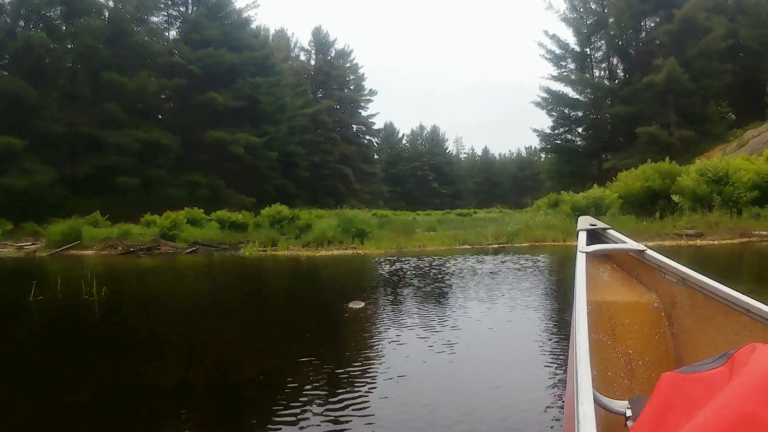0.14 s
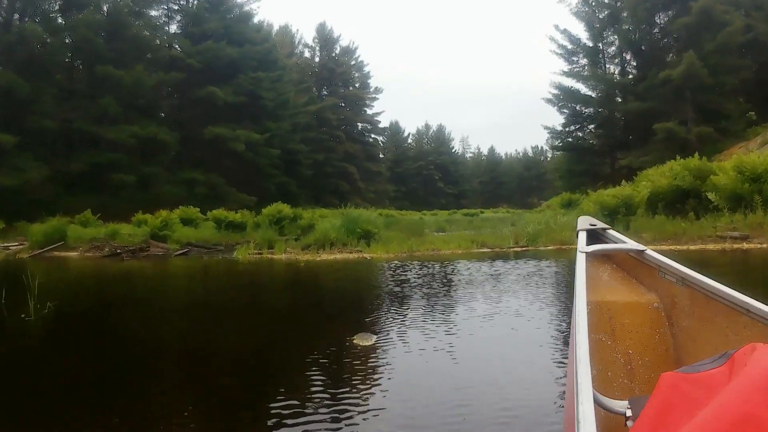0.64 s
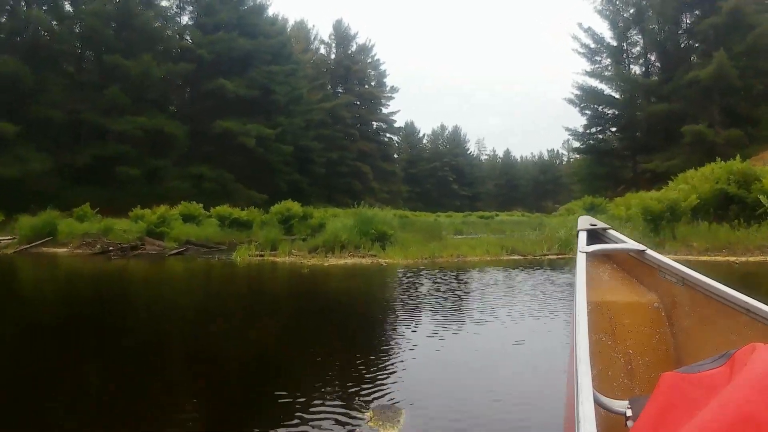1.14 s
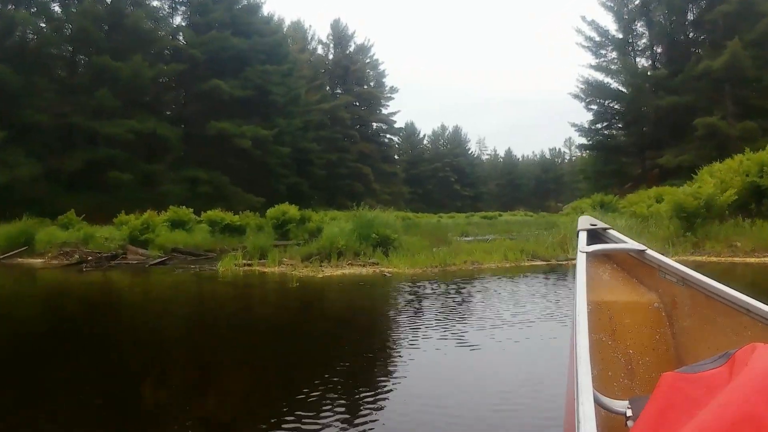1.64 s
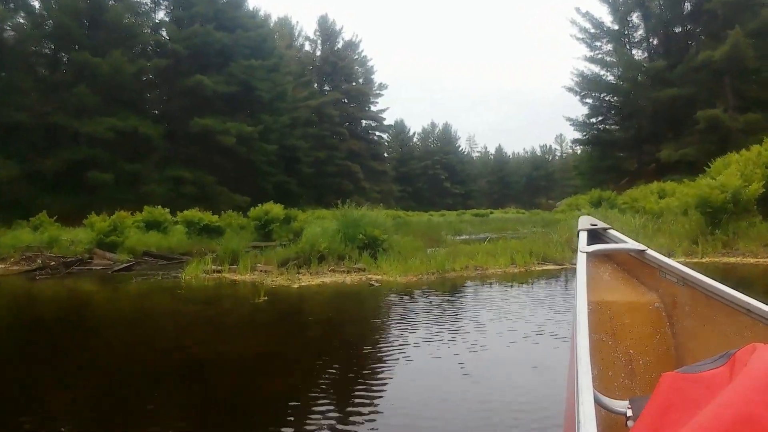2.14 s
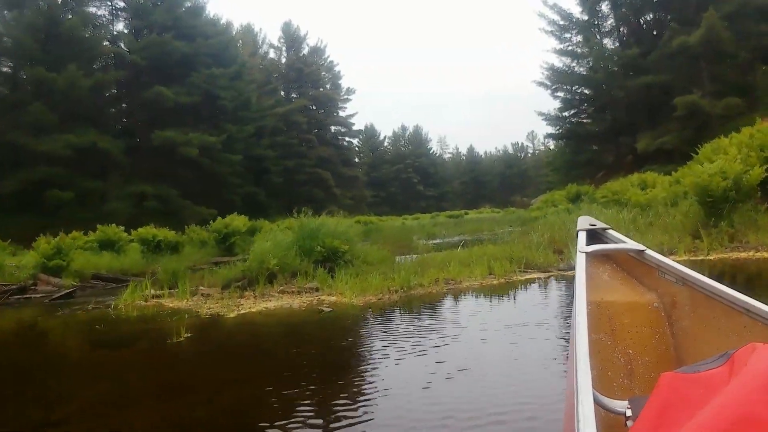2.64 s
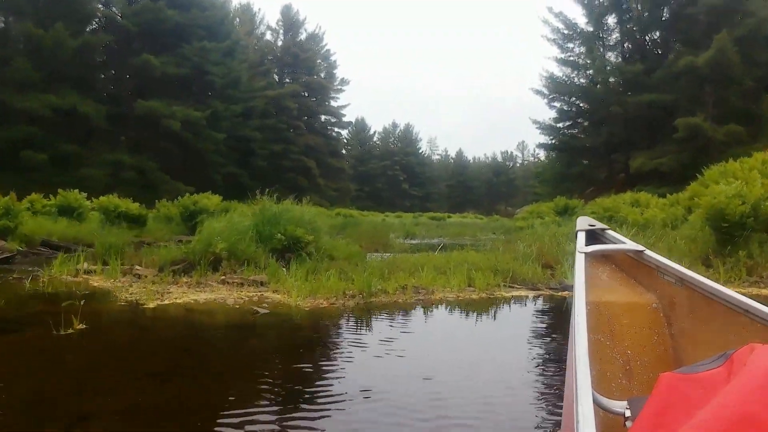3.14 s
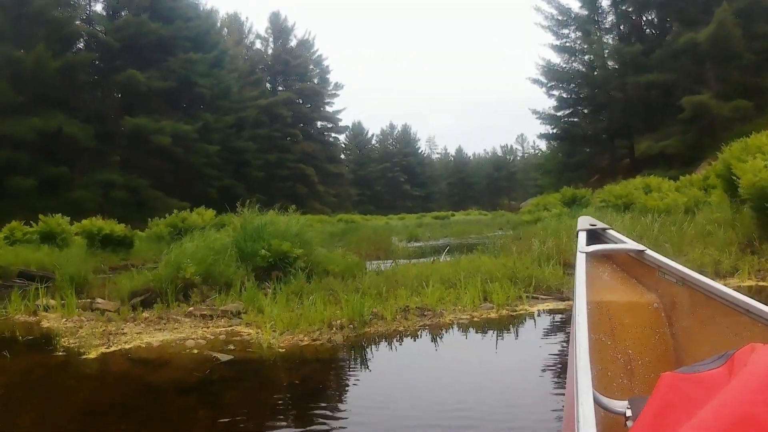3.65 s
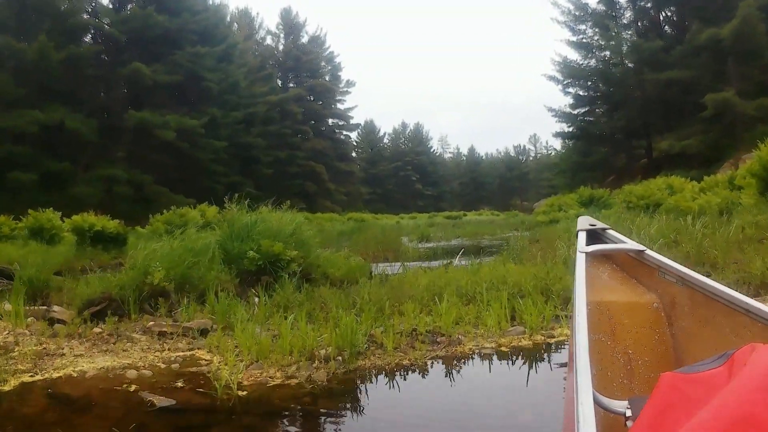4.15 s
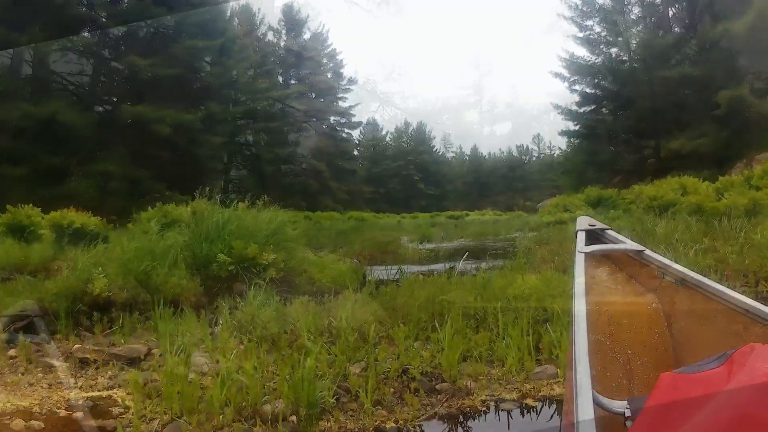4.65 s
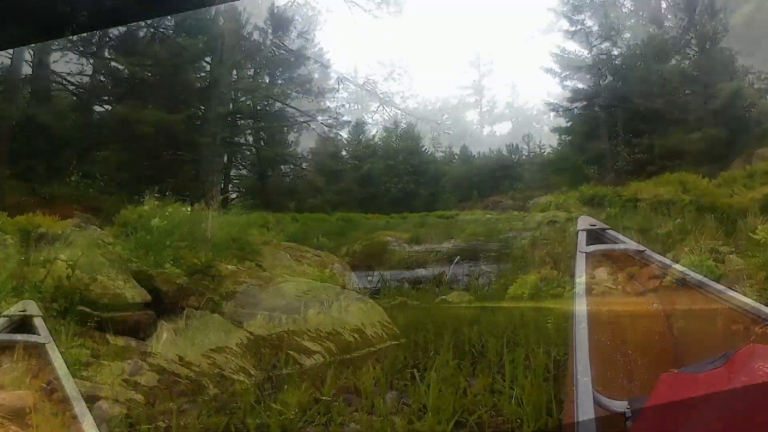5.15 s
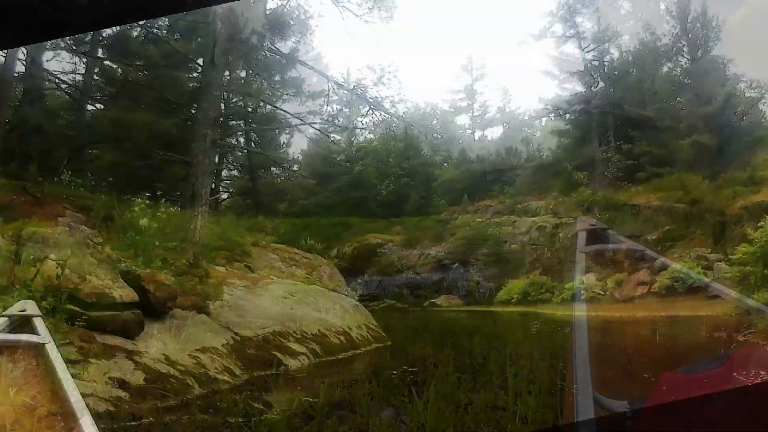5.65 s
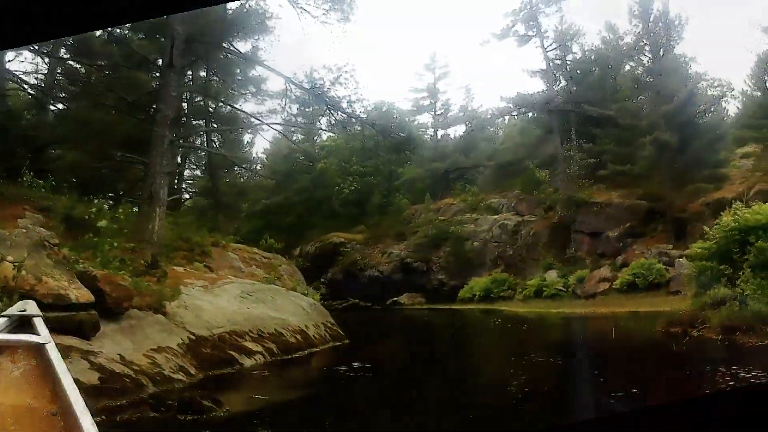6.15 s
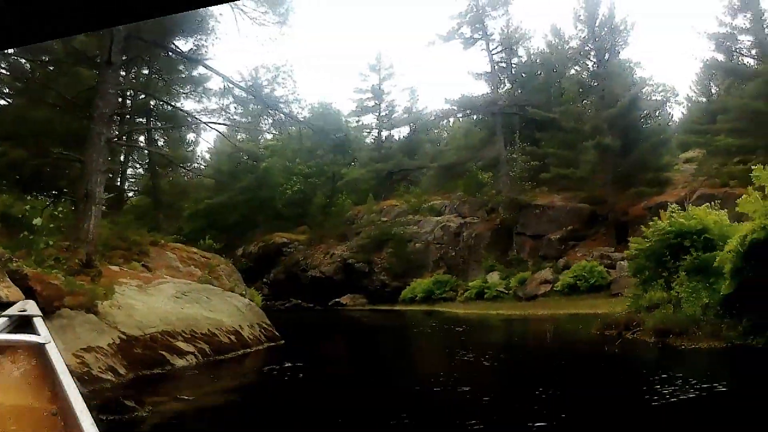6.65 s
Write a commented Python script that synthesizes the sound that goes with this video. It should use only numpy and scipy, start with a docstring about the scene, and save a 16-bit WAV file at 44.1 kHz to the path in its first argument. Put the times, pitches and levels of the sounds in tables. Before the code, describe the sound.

The setting is a quiet marsh channel, heard close from a small microphone on a canoe, over barely audible hiss and a faint wavering low hum. It opens with soft low thumps on the microphone, then tiny drips and light taps, with a faint breathy rubbing squeak near 1.1 and 1.55 s. At about 2.0 s a strong hollow knock and bubbly plop strikes, followed by short watery swishes at 2.1 and 2.4 s. More knocks and splashes come at 2.85, 3.1-3.2 and 3.6 s, the last a bright, crisp splash. From 3.7 to 5.0 s it is nearly still, with small slaps, bumps and a faint squeak. At 5.05-5.35 s a sharp splash and abrupt swish ring out, with one thin high bird chirp around 5.3 s. Low thumps follow near 5.55 s, then churning, gurgling, fizzing water swells around 6.1-6.35 s and dies away by 6.8 s.

```python
"""A quiet marsh channel, heard at one small microphone on board a gliding canoe.
The paddle swishes, splashes and knocks: struck hull modes ring under bright noise spray,
and torn water is a sum of gliding bubble tones, resonant noise and fizz.
Low noise and single pulses thump the microphone, narrow noise squeaks, and a small bird chirps once
as a gliding tone with its octave, over faint filtered hiss and a wavering harmonic hum."""
import sys
import numpy as np
from scipy import signal
from scipy.fft import rfft, irfft, next_fast_len
from scipy.io import wavfile
from scipy.ndimage import uniform_filter1d

SR = 44100
rng = np.random.default_rng(int(sys.argv[2]) if len(sys.argv) > 2 else 0)


def voltage_ratio(decibels):
    """Convert decibels (scalar or array-like) to amplitude ratios, 20 dB per decade."""
    exponent = np.asarray(decibels, float) / 20
    return 10 ** exponent


def log_audio(samples):
    """Write samples as a 16-bit WAV file to the path given in sys.argv[1]."""
    # one column per channel
    frames = np.atleast_2d(samples).T
    # limit to full scale, then quantise
    limited = np.clip(frames, -1, 1)
    pcm = np.round(limited * 32767).astype(np.int16)
    wavfile.write(sys.argv[1], SR, pcm)


N = 298557


def evened(x):
    """Normalisation: scales a signal to an rms of 1."""
    return x / np.sqrt(np.mean(x ** 2) + 1e-20)


def add(mix, s, sound):
    """Superposition: sums a sound into the mix from s seconds on."""
    part = mix[max(round(s * SR), 0):][:len(sound)]
    part += sound[:len(part)]


def coloured(x, points):
    """Linear filtering: a gain in dB, interpolated over log frequency, multiplies the spectrum."""
    size = next_fast_len(len(x))
    f, db = np.transpose(points)
    hz = np.fft.rfftfreq(size, 1 / SR)
    gain = voltage_ratio(np.interp(np.log(hz + 1), np.log(f + 1), db))
    return irfft(rfft(x, size) * gain, size)[:len(x)]


def resonate(x, hz, width):
    """Resonance by heterodyning: shifts hz to zero, smooths, and shifts back, with gain 1 at the peak."""
    turn = np.exp(2j * np.pi * np.cumsum(hz * np.ones(len(x))) / SR)
    r = np.exp(-np.pi * width / SR)
    return 2 * (turn * signal.lfilter([1 - r], [1, -r], x / turn)).real


def grainy(size, lump_ms, depth_db):
    """Random amplitude modulation: noise whose loudness varies from one small lump to the next."""
    lump = max(round(lump_ms * SR / 1000), 1)
    lumps = evened(uniform_filter1d(rng.standard_normal(size), lump))
    return evened(rng.standard_normal(size) * voltage_ratio(depth_db * lumps))


# Spectrum of the faint hiss. Each row: frequency in Hz, relative density in dB per Hz.
HISS_SPECTRUM = [(18, -19.5), (30, 4), (59, 0), (184, -28.5), (394, -15.5), (526, -19.5), (649, -17),
                 (3490, -22), (13700, -32.5), (16000, -25.5)]


def hiss():
    """Shaped broadband noise: a faint flickering hiss."""
    level_db = -73.5
    return voltage_ratio(level_db) * evened(coloured(grainy(N, lump_ms=25, depth_db=3.0), HISS_SPECTRUM))


# Course of the hum. Each row: time in seconds, fundamental before drift in Hz, level in dB.
HUM_COURSE = [(0, 51.5, -76.5), (1.7, 52, -72.5), (2.9, 50.3, -86), (4, 50.7, -79), (4.7, 49.5, -77.5),
              (5.599, 53.3, -100)]
# Harmonics of the hum. Each row: multiple of the fundamental, dB relative to the course.
HUM_HARMONICS = [(1, -4.5), (2, -2), (3, -8), (4, -11)]


def hum():
    """Harmonic series on a drifting fundamental: a wavering low flutter."""
    s, hz, db = np.transpose(HUM_COURSE)
    t = np.arange(N) / SR
    drift = 1 + .015 * evened(uniform_filter1d(rng.standard_normal(N), size=6000))
    phase = 2 * np.pi * np.cumsum(np.interp(t, s, hz) * drift) / SR
    partials = sum(voltage_ratio(level) * np.cos(k * phase) for k, level in HUM_HARMONICS)
    return voltage_ratio(np.interp(t, s, db)) * partials


# Air and handling on the microphone. Each row: time in seconds, level in dB.
BUFFET_LEVEL = [(0, -43), (.15, -67), (.77, -67), (1.13, -69.5), (2.4, -61.5), (2.6, -72.5), (4.001, -75.5),
                (4.28, -64.5), (4.6, -81.5), (5, -83), (5.099, -52), (5.5, -58.5), (5.8, -66.5),
                (6.05, -55.5), (6.4, -55), (6.6, -60.5), (6.77, -70)]
# Spectrum of the buffeting. Each row: frequency in Hz, relative density in dB per Hz.
BUFFET_SPECTRUM = [(9, -17.5), (15, -4), (35, -1.5), (70, -13), (160, -15), (300, -28), (700, -38.5),
                   (2000, -70)]


def buffet():
    """Pressure fluctuation: lumpy low noise from air and handling at the diaphragm."""
    s, db = np.transpose(BUFFET_LEVEL)
    rumble = evened(coloured(grainy(N, lump_ms=25, depth_db=2), BUFFET_SPECTRUM))
    return rumble * voltage_ratio(np.interp(np.arange(N) / SR, s, db))


# Single soft pushes. Each row: centre in seconds, nominal peak in dB, nominal width in ms.
PUSHES = [(0.003, -32.5, 2.1), (0.037, -32.5, 2.1), (0.06, -40.5, 1.7), (0.088, -40, 1.54),
          (0.145, -41, 2.9), (0.394, -42.5, 2.2), (0.448, -44.5, 2.7), (0.985, -48.5, 4.6),
          (1.077, -41.5, 4.9), (1.103, -41.5, 1.96), (1.162, -40.5, 5.2), (1.454, -45, 3.9),
          (1.551, -39.5, 3.1), (1.576, -49, 5.2), (1.726, -43, 4.6), (1.764, -47, 2.4), (1.806, -46, 5.4),
          (2.138, -54, 3.5), (2.391, -44, 8.6), (2.464, -45, 3.8), (4.093, -50.5, 3.3), (4.166, -37, 4.1),
          (4.194, -46, 3.3), (4.297, -43, 3), (4.365, -48, 4.5), (5.08, -29.5, 1.1), (5.52, -39, 22),
          (5.544, -31.5, 13.4), (5.594, -32, 11), (6.03, -42, 7.5), (6.1, -36.5, 21)]


def thumps():
    """Transient displacement: each push on the diaphragm is a pointed pulse with a rebound."""
    out = np.zeros(N)
    for s, db, width_ms in PUSHES:
        u = np.arange(-4096, 4096) / SR / (width_ms * 0.00064)
        push = (1 - 0.69 * u ** 2 + .5 * u) * np.exp(-abs(u) ** 1.29 / 1.42)
        puff = evened(signal.lfilter(*signal.butter(1, 350, fs=SR), rng.standard_normal(len(u))))
        # the gust rustles, less so when the push is wide
        push = push + voltage_ratio(-21.5) * puff * np.exp(-(u / 4.5) ** 2) * min(4 / width_ms, 1)
        start = round(s * SR) - len(u) // 2
        add(out, start / SR, voltage_ratio(db) * push[max(-start, 0):])
    return out


# Breathy squeaks of rubbing. Each row: start in seconds, length in seconds, centre in Hz, level in dB.
RUBS = [(1.066, 0.039, 4200, -66), (1.55, 0.057, 5360, -69), (4.259, 0.032, 5850, -70)]


def squeaks():
    """Narrow-band noise: something rubbing on board, as puffs passed twice through one resonance."""
    out, width_hz = np.zeros(N), 410
    for s, length, hz, db in RUBS:
        size = round(length * SR)
        once = resonate(rng.standard_normal(size), hz, width_hz)
        band = evened(resonate(once, hz, width_hz))
        add(out, s, voltage_ratio(db) * np.hanning(size) * band)
    return out


# Pitch of the chirp before smoothing. Each row: time in seconds, frequency in Hz.
CHIRP_PITCH = [(5.263, 7700), (5.274, 7620), (5.286, 8780), (5.331, 8630), (5.35, 5760)]


def bird():
    """Frequency modulation: one thin arch of a note, gliding together with its octave."""
    base_db, climb_db, low_db = -40.5, -5, 2.5  # softer while it climbs, stronger at the low ends
    s, hz = np.transpose(CHIRP_PITCH)
    t = np.arange(s[0], s[-1], 1 / SR)
    hz = uniform_filter1d(np.interp(t, s, hz), size=150)
    climb = np.clip(np.gradient(hz) / 1.2, 0, 1)
    low = np.clip((hz.max() - hz) / 1000, 0, 1)
    edge = np.clip(np.minimum(t - t[0], t[-1] - t) / 0.0024, 0, 1)
    phase = 2 * np.pi * np.cumsum(hz) / SR
    waver = 1 + 0.28 * evened(uniform_filter1d(rng.standard_normal(len(t)), size=60))
    level = voltage_ratio(base_db + climb_db * climb + low_db * low) * edge * waver
    return s[0], np.sqrt(2) * level * (np.sin(phase) + voltage_ratio(-7) * np.sin(2 * phase))


def bubble(hz, cycles, glide):
    """Bubble resonance: an air pocket rings and rises in pitch as it nears the surface."""
    u = np.arange(int(cycles / hz * SR)) / SR * hz / cycles  # 0 to 1 over its life
    return np.sin(2 * np.pi * cycles * (u + glide * (u ** 2 - u))) * np.sin(np.pi * u ** .6)


def bubbles(hz, per_s, cycles):
    """Superposed bubble resonances: small bubbles scattered around a moving centre."""
    out, count = np.zeros(len(hz)), int(per_s * len(hz) / SR) + 1
    for place, spread, size, long in rng.random((count, 4)):
        at = int(place * len(hz))
        f = max(hz[at] * 2 ** (4.1 * (spread - .45)), 300 + 90 * long)
        tone = bubble(f, cycles * (.5 + long) * (f / 700) ** 0.37, glide=0.084)
        loudness = voltage_ratio(-4 * np.log(size + 0.02)) * (hz[at] / f) ** 0.2
        add(out, at / SR, tone * loudness)
    return evened(out)


def spits(size):
    """Impulsive excitation: droplets thrown out of the fizz, as sparse gain jumps that die away."""
    per_s, decay_ms, jump_db = 12, 4.9, 1.5  # the jump is an average over random sizes
    hits = (rng.random(size) < per_s / SR) * rng.exponential(1, size)
    return 1 + voltage_ratio(jump_db) * signal.lfilter([1], [1, -np.exp(-1000 / (decay_ms * SR))], hits)


def shake(x):
    """Structure-borne sound: the low part of a blow that reaches the microphone through the hull."""
    return evened(signal.lfilter(*signal.butter(2, 70, fs=SR), x))


def gush(t, db, fizz_db, hz, fizz_colour):
    """Turbulence with entrained air: bubbles and a broad rush round the blade, fizz above."""
    rush = resonate(grainy(len(t), lump_ms=6.2, depth_db=2.5), hz, 620)
    rush = evened(coloured(rush, [(120, -33), (260, -1.0), (2500, -7.0), (8000, -17.0)]))
    gurgle = evened(.65 * rush + .72 * bubbles(hz, per_s=700, cycles=8))
    fizz = evened(coloured(grainy(len(t), lump_ms=5, depth_db=3), fizz_colour)) * spits(len(t))
    low = shake(grainy(len(t), lump_ms=7.2, depth_db=0.5))
    edge = np.clip(np.minimum(t - t[0], t[-1] - t) / 0.0019, 0, 1)
    return t[0], voltage_ratio(db - 5.5) * edge * (gurgle + voltage_ratio(fizz_db) * fizz + voltage_ratio(-12.0) * low)


# Churning water after a stroke, with high fizz. Each row: time in seconds, nominal level in dB.
WASH_LEVEL = [(5.36, -54), (5.44, -67.5), (5.5, -57), (5.65, -55.5), (5.8, -70.5), (5.92, -50.5),
              (6.0, -46), (6.07, -36.5), (6.11, -38.5), (6.16, -44.5), (6.21, -40), (6.25, -39.5),
              (6.29, -50), (6.35, -41), (6.47, -48), (6.67, -53.5), (6.77, -67)]
# Spectrum of its fizz. Each row: frequency in Hz, relative density in dB per Hz.
WASH_SPECTRUM = [(880, -26), (1500, -10), (3000, -2), (5440, -2), (8000, -2.5), (10500, -14), (16000, -22)]


def wash():
    """Turbulence that swells and ebbs: churning water whose gurgle wanders in pitch."""
    centre_hz, wander_octaves = 720, 0.24
    s, db = np.transpose(WASH_LEVEL)
    t = np.arange(s[0], s[-1], 1 / SR)
    db = np.interp(t, s, db)
    wander = uniform_filter1d(rng.standard_normal(len(t)), size=1500)
    wander = evened(uniform_filter1d(wander, size=1500))
    fizz_db = -10.5 - 0.38 * (db + 62)  # the fizz grows less than the body
    return gush(t, db, fizz_db, centre_hz * 2 ** (wander_octaves * wander), WASH_SPECTRUM)


# Spectrum of fizz at the blade, for all swishes. Each row: frequency in Hz, relative density in dB per Hz.
BLADE_FIZZ = [(880, -38), (1500, -6.5), (3090, -7), (3590, -5.5), (4040, -9.5), (5880, -12.5),
              (14800, -24.5), (16000, -38)]
# A short watery swish with abrupt edges. Each row: time in seconds, nominal level in dB,
# fizz against body in dB.
ABRUPT_COURSE = [(5.166, -32, -4), (5.2, -37, -15), (5.25, -47, -9), (5.27, -40, -5.5),
                 (5.351, -39.5, -8.5)]


def abrupt_swish():
    """Turbulence gated by abrupt edges: a short watery swish, dipping in the middle."""
    centre_hz = 1050
    s, db, fizz_db = np.transpose(ABRUPT_COURSE)
    t = np.arange(s[0], s[-1], 1 / SR)
    return gush(t, np.interp(t, s, db), np.interp(t, s, fizz_db), centre_hz + 0 * t, BLADE_FIZZ)


# Swishes of the blade, one swell each. Each row: start in seconds, crest in seconds, end in seconds,
# nominal crest level in dB, fizz against body at the crest in dB.
SWELLS = [(0, 0.006, 0.15, -54, -6), (0.951, 1.103, 1.19, -54, -2.5), (1.519, 1.56, 1.63, -62, 2.5),
          (2.094, 2.123, 2.155, -39.5, -18.5), (2.341, 2.397, 2.54, -37, -6),
          (2.817, 2.879, 2.92, -42.5, -11), (3.132, 3.148, 3.19, -43.5, -1), (3.167, 3.209, 3.3, -36.5, -5),
          (3.587, 3.613, 3.66, -32, 0.4)]


def swishes():
    """Turbulence swelling and ebbing: each swish is brightest and highest at its crest."""
    out = np.zeros(N)
    for start, crest, end, crest_db, crest_fizz_db in SWELLS:
        t = np.arange(start, end, 1 / SR)
        away = np.interp(t, [start, crest, end], [1, 0, 1]) ** 1.204
        db = crest_db - 23.5 * away
        fizz_db = crest_fizz_db - 5.5 * away
        # the gurgle rises an octave for each 18 dB of fizz, from 443 Hz up
        hz = 443 * 2 ** np.clip((db + fizz_db + 62.5) / 18, 0, 2)
        add(out, *gush(t, db, fizz_db, hz, BLADE_FIZZ))
    return out


# Air pockets ringing clearly in a splash or under water. Each row: start in seconds, peak in dB,
# mean frequency in Hz, length in ms.
POCKETS = [(0.079, -59, 417, 30), (.262, -54, 630, 17), (1.223, -45.5, 2820, 5.1), (1.22, -48.5, 615, 24),
           (1.978, -26, 732, 32), (1.98, -33, 296.6, 59), (2.205, -60.5, 2820, 9.9), (2.878, -40, 826, 26),
           (2.335, -50, 390, 28), (3.104, -30, 3410, 3.3), (3.11, -28, 962, 26), (3.411, -41.5, 4420, 5.2),
           (3.673, -25.5, 1920, 3.9), (5.05, -27.5, 879, 13.6), (5.195, -30, 1590, 8.3),
           (5.236, -33, 2210, 6.9), (5.571, -50.5, 1050, 30), (5.955, -41.5, 963, 24),
           (6.014, -34, 349, 27.5), (6.045, -41, 237, 23), (6.095, -39.5, 770, 28), (6.195, -38.5, 963, 10),
           (6.199, -36, 363, 28), (6.222, -35.5, 375, 22), (6.227, -39, 824, 24), (6.325, -42.5, 722, 39),
           (6.369, -41, 480, 31), (6.449, -52, 480, 52), (6.498, -44.5, 199, 30)]


def gurgles():
    """Bubble resonance: single air pockets, each with its own ring."""
    out = np.zeros(N)
    for s, db, hz, length_ms in POCKETS:
        add(out, s, voltage_ratio(db) * bubble(hz, hz * length_ms / 1000, glide=0.007))
    return out


# Modes of the hull. Each row: nominal frequency in Hz, nominal bandwidth in Hz, relative level in dB.
HULL_MODES = [(281, 110, 14), (400, 100, 11.5), (580, 180, 5.5), (710.6, 70, 2.5), (965, 97, 3),
              (1180, 88, -2.5), (1670, 420, 6), (1920, 120, -9), (2500, 130, -25), (3220, 90, -21.5),
              (4245, 300, -24.5)]
# Spectrum of the spray. Each row: frequency in Hz, relative density in dB per Hz.
SPRAY_SPECTRUM = [(880, -28.5), (1500, -6.5), (1900, -3.5), (2860, -3.5), (4420, -7), (13300, -24),
                  (16000, -30)]


def strike(s, db, hz, treble_db, t60, rise_ms):
    """Modal excitation: a ragged burst rings the hull modes near hz; a brighter spray dies faster."""
    t = np.arange(round(.2 * SR)) / SR
    t60 = np.clip(t60, .015, .3)
    peak_s = max(rise_ms, .3) / 1000
    rise = np.minimum(t / peak_s, 1) ** 0.36
    since = np.maximum(t - peak_s, 0)
    blow = grainy(len(t), lump_ms=1.5, depth_db=3) * rise * voltage_ratio(-60 * since / t60)
    # each spot on the hull rings a little differently
    shift = 1 + 0.077 * rng.standard_normal(len(HULL_MODES))
    body = np.zeros(len(t))
    for (f, width, level), k in zip(HULL_MODES, shift):
        gain = voltage_ratio(level - 12.5 * abs(np.log2(f / hz))) * np.sqrt(100 / width)
        body += gain * resonate(blow, f * k, max(width, 50))
    body = coloured(body, [(120, -24.5), (190, -9.5), (280, -2.5), (2000, -1.5), (8000, -34.0)])
    drip = voltage_ratio(-27.5 - 60 * since / 0.37)  # fine drops keep falling after the blow
    spray = evened(coloured(grainy(len(t), lump_ms=0.86, depth_db=3.5), SPRAY_SPECTRUM))
    spray = spray * np.sqrt(rise) * (voltage_ratio(-60 * since / (0.9 * t60)) + drip)
    low = shake(blow)

    def peaked(x):
        """Peak normalisation: scales the loudest 130-sample stretch to an rms of 1."""
        return x / np.sqrt(uniform_filter1d(x ** 2, size=130).max())

    fade = np.minimum((t[-1] - t) / .06, 1)
    parts = peaked(body) + voltage_ratio(treble_db - 1.0) * peaked(spray) + voltage_ratio(-19) * peaked(low)
    return s, voltage_ratio(db) * fade * parts


def drips():
    """Random impacts: faint drops off the blade, scattered uniformly in time."""
    out, per_s, base_db = np.zeros(N), 2.5, -75.5
    for place, size, pitch in rng.random((int(per_s * N / SR), 3)):
        hz = 550 * 2 ** pitch
        add(out, *strike(place * N / SR, base_db + 8 * size ** 2, hz, 1.3, 0.044, rise_ms=1.9))
    return out


# Water slapping the hull. Each row: start in seconds, nominal peak in dB, centre of the ring in Hz,
# nominal treble against body in dB, nominal decay time t60 in seconds.
WATER_SLAPS = [(0.631, -70, 895, -1, 0.1), (0.73, -65, 635, -6, 0.096), (1.158, -61, 720, 2.2, 0.1),
               (1.475, -57, 866, -10, 0.074), (1.996, -24.5, 650, -16.5, 0.043),
               (2.46, -42, 674, -31, 0.044), (2.492, -51, 605, -4, 0.027), (3.11, -27.5, 1040, -6.5, 0.049),
               (4.087, -63, 750, -1, 0.1), (4.19, -65.5, 790, 6.5, 0.097), (4.295, -61.5, 294, -3, 0.057),
               (4.415, -57.5, 416, -12, 0.14), (4.665, -69, 496, -12, 0.1), (4.735, -68, 1010, -4, 0.09),
               (4.8, -41.5, 404, -19, 0.073), (5.049, -27, 690, -11.5, 0.084), (5.556, -56, 890, 0, 0.15)]


def slaps():
    """Modal excitation with a slow onset: water slapping the hull."""
    out = np.zeros(N)
    for row in WATER_SLAPS:
        add(out, *strike(*row, rise_ms=10.5))
    return out


# Paddle and drops striking sharply. Each row: start in seconds, nominal peak in dB, centre of the ring
# in Hz, nominal treble against body in dB, nominal decay time t60 in seconds.
PADDLE_KNOCKS = [(0.031, -70, 290, -27, 0.031), (0.089, -63, 337, -3, 0.16), (0.141, -69, 557, 8.5, 0.034),
                 (0.217, -64, 920, -3.5, 0.083), (0.267, -53.5, 1150, -8.5, 0.15),
                 (0.392, -53.5, 815, -10, 0.047), (0.409, -54, 905, -8, 0.091),
                 (0.434, -60.5, 555, -4, 0.23), (1.041, -53.5, 553, -19, 0.13),
                 (1.223, -44.5, 720, -11.5, 0.095), (1.31, -56, 1020, -7.5, 0.096),
                 (1.6, -51.5, 805, -14, 0.046), (1.725, -56, 720, 2.5, 0.069), (1.805, -67, 825, 2.5, 0.17),
                 (1.933, -57, 470, -4.5, 0.42), (1.975, -24, 700, -11.5, 0.11),
                 (2.024, -37.5, 453, -14, 0.064), (2.164, -46, 520, -2.5, 0.047),
                 (2.206, -58, 690, -2.5, 0.085), (2.278, -60.5, 850, -3.5, 0.38),
                 (2.335, -41.5, 416, -22, 0.15), (2.387, -41, 1100, -4, 0.1), (2.54, -63.5, 950, 3, 0.11),
                 (2.765, -59.5, 400, -11, 0.086), (2.846, -40, 670, -15, 0.087),
                 (2.877, -40.5, 720, -17, 0.041), (3.028, -48, 360, -1, 0.058),
                 (3.103, -39.5, 2470, 1, 0.04), (3.131, -33, 580, -15.5, 0.09),
                 (3.234, -36.5, 880, -11, 0.072), (3.284, -66, 400, -6, 0.18),
                 (3.319, -62.5, 603, -12, 0.046), (3.412, -52.5, 1340, 7.5, 0.022),
                 (3.447, -56.5, 850, 9.5, 0.029), (3.506, -37.5, 960, -10, 0.068),
                 (3.627, -38.5, 660, -13, 0.15), (3.672, -30.5, 790, -14.5, 0.075),
                 (3.983, -48, 590, -14, 0.046), (4.843, -61.5, 590, -8, 0.13),
                 (5.15, -56.5, 1400, 0, 0.047), (5.185, -34.5, 1190, -5.5, 0.37),
                 (5.196, -33, 1290, -13, 0.074), (5.211, -39.5, 1400, 0.5, 0.2),
                 (5.239, -38.5, 820, 1, 0.028), (5.385, -58.5, 710, -8.5, 0.1), (5.948, -36, 790, -3, 0.12),
                 (6.015, -37.5, 378, -12.5, 0.13), (6.097, -45.5, 835, -8.5, 0.13),
                 (6.33, -52, 900, -1.5, 0.047), (6.372, -42, 524, -25, 0.091)]


def knocks():
    """Modal excitation with a sharp onset: paddle and drops striking."""
    out = np.zeros(N)
    for row in PADDLE_KNOCKS:
        add(out, *strike(*row, rise_ms=1.9))
    return out


def scene():
    """Superposition: all sources sum at one microphone."""
    mix = hiss() + hum() + buffet() + thumps() + squeaks()
    for sound in (bird(), wash(), abrupt_swish()):
        add(mix, *sound)
    mix += swishes() + gurgles() + drips() + slaps() + knocks()
    return mix[None]


def roll_off(x):
    """The treble ends steeply here."""
    return signal.sosfilt(signal.butter(12, 16530, fs=SR, output="sos"), x)


def record(dry):
    """Frequency response: the microphone fades at the very top."""
    finished = coloured(dry[0], [(14500, 0.5), (16500, -8.5)])[None]
    return roll_off(finished)


dry = scene()
out = record(dry)
log_audio(out)
```